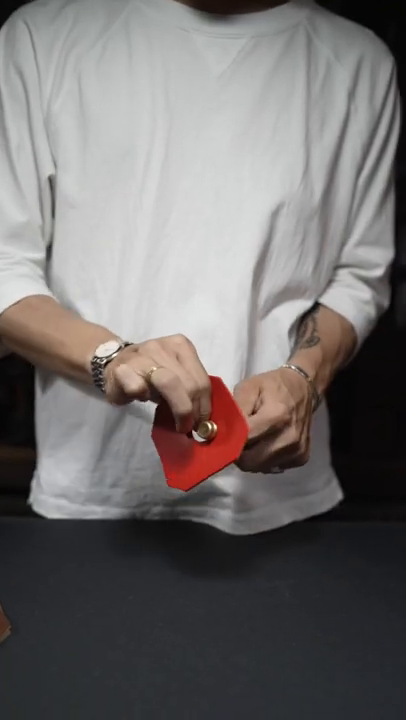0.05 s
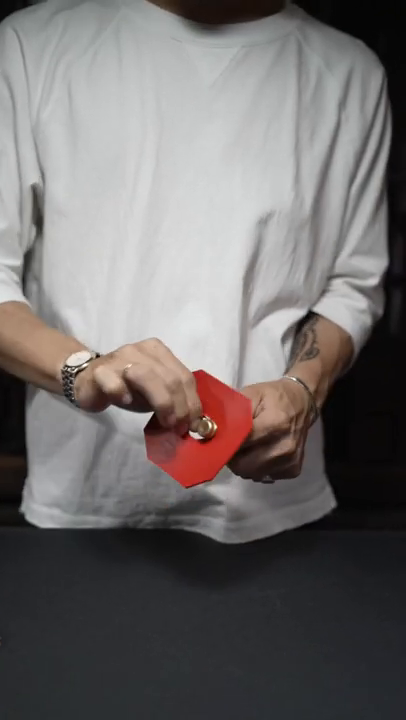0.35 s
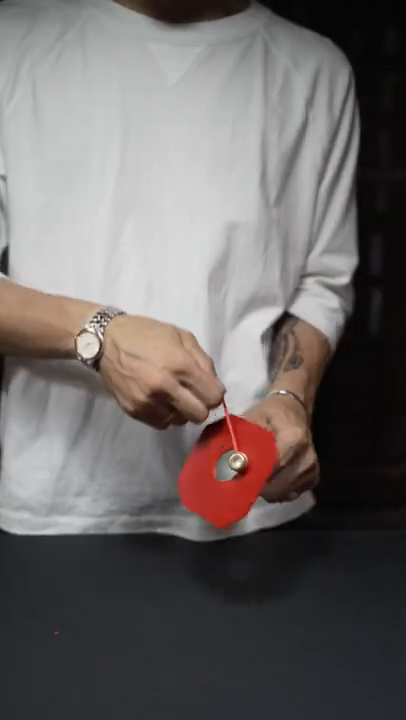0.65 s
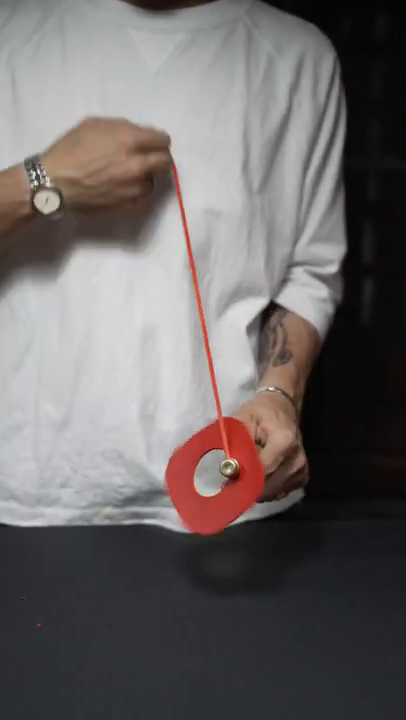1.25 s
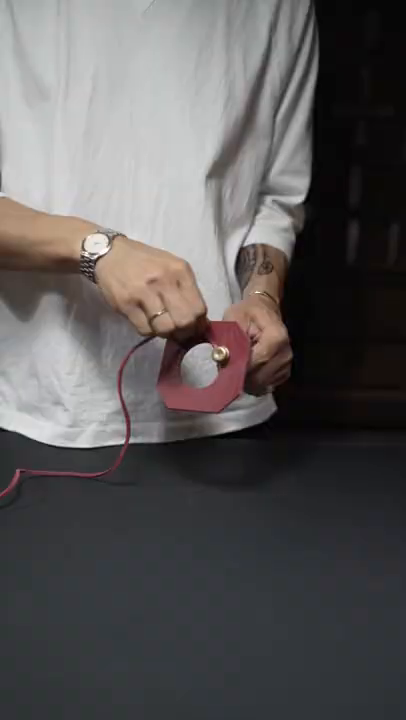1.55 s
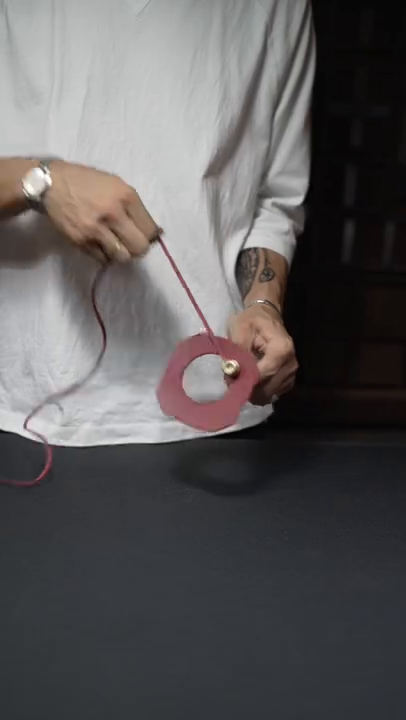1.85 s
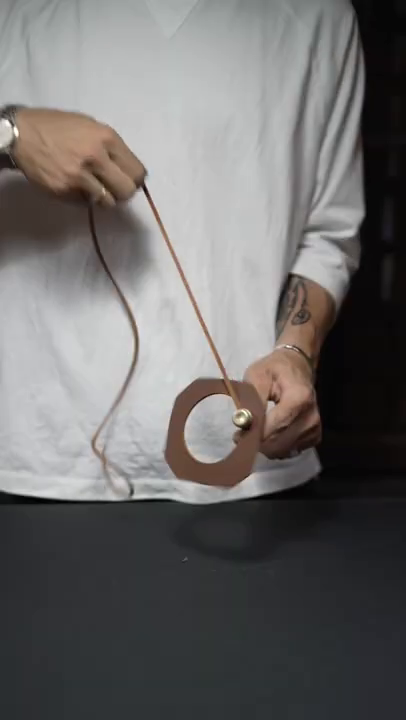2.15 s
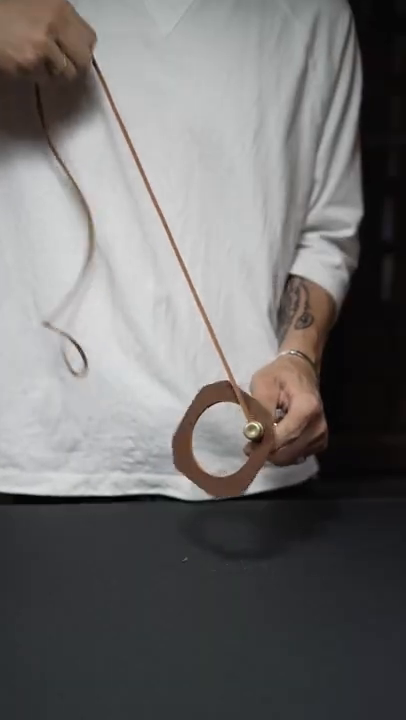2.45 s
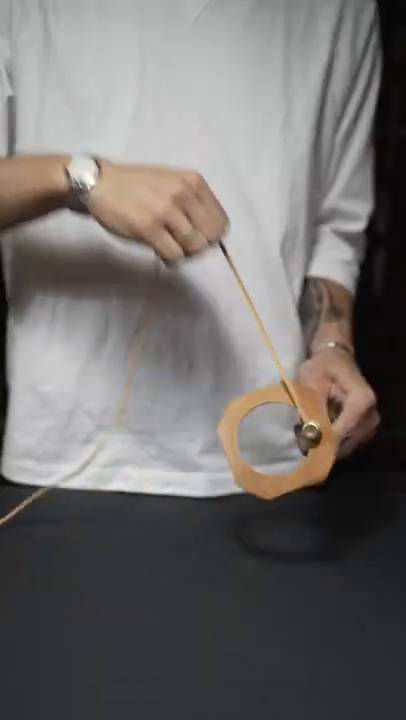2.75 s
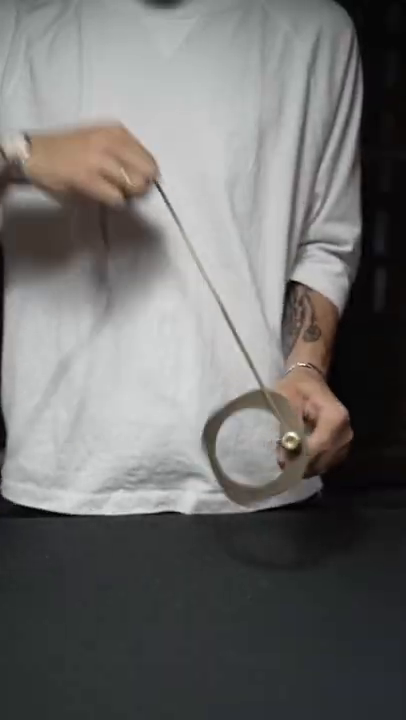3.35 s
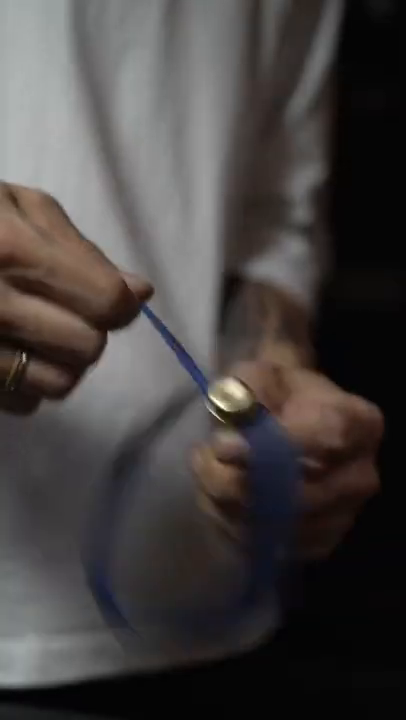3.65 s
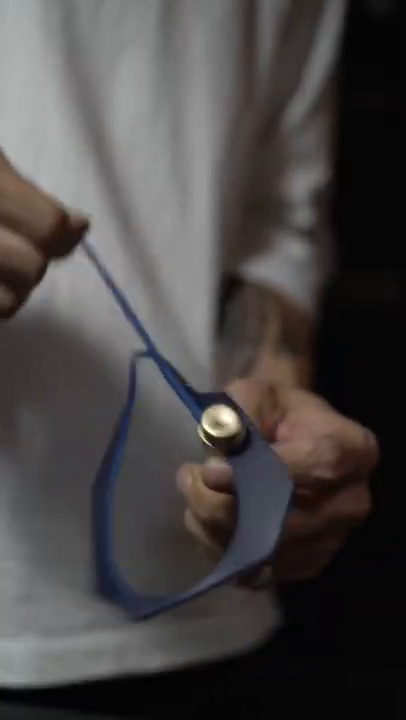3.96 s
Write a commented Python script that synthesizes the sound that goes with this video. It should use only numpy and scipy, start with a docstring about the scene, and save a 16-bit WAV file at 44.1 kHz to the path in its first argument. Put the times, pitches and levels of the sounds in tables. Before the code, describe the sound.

Leather being pulled through a small blade in repeated scraping, hissing strokes, with light clicks.

```python
"""Leather discs are pulled through a small brass lace cutter: a crackling first nick, a short tug,
then six long pulls on different hides. Fibres snap densely on the blade, and the lace sings faintly
in the slot. Fingers tick on the tool; underneath lie soft handling bumps, mains hum and a quiet room.
One close microphone, the same in both channels."""
import sys
import numpy as np
from scipy import signal
from scipy.fft import rfft, irfft
from scipy.io import wavfile
from scipy.ndimage import uniform_filter1d

SR = 44100
rng = np.random.default_rng(int(sys.argv[2]) if len(sys.argv) > 2 else 0)


def generate_wav(signal):
    """Clip the signal to [-1, 1] and save it as 16-bit WAV at the path in sys.argv[1]."""
    frames = np.transpose(np.atleast_2d(signal))
    scaled = np.clip(frames, -1, 1) * 32767
    pcm = np.round(scaled).astype(np.int16)
    wavfile.write(sys.argv[1], SR, pcm)


N = 4 * SR


def undb(db):
    """Decibels to gain."""
    return 10 ** (np.asarray(db) / 20)


def unit(x):
    """Scale to rms 1."""
    return x / np.sqrt(np.mean(x ** 2) + 1e-20)


def shaped(x, gain):
    """Filter by gain(freq_hz)."""
    freq_hz = np.arange(N // 2 + 1) * SR / N + .01
    return irfft(rfft(x) * gain(freq_hz), N)


def colour(x, points):
    """Filter by rows of freq_hz, gain_db."""
    hz, db = np.array(points, float).T
    return shaped(x, lambda f: undb(np.interp(np.log(f), np.log(hz), db)))


def band(x, low_hz, high_hz):
    """Steep band-pass."""
    return shaped(x, lambda f: 1 / ((1 + (low_hz / f) ** 12) * (1 + (f / high_hz) ** 12)))


def resonate(x, hz, width_hz):
    """One damped resonance."""
    return shaped(x, lambda f: 1 / (1 + 1j * (f / hz - hz / f) * hz / width_hz))


def wander(rate_hz):
    """Smooth random motion, rms 1."""
    return unit(shaped(rng.standard_normal(N), lambda f: 1 / (1 + (f / rate_hz) ** 2)))


# freq_hz, rms_db
HUM_PARTIALS = [(59.9, -57), (121, -82.5), (182.5, -73.5), (365, -72)]

def mains_hum(t):
    """Steady mains tone and overtones."""
    return sum(undb(db) * np.sqrt(2) * np.sin(2 * np.pi * (hz * t + rng.random()))
               for hz, db in HUM_PARTIALS)


# freq_hz, gain_db
AIR_SPECTRUM = [(15, 1), (35, -20.5), (80, -11.5), (140, -12.5), (350, -15), (700, -19.5), (1300, -30.5),
                (3000, -35.5), (8000, -36.5), (15500, -45)]

def room_air(rms_db=-59):
    """Dull, steady room noise."""
    return undb(rms_db) * unit(colour(rng.standard_normal(N), AIR_SPECTRUM))


def add_reflections(x, t, wet_db=-17, t60_s=.067):
    """Direct sound plus the workshop's short, faint reflections."""
    tail = rng.standard_normal(N) * np.exp(-np.log(1000) * t / t60_s)
    return x + undb(wet_db) * signal.fftconvolve(x, unit(tail) / np.sqrt(N))[:N]


# centre_s, peak_db, pitch_hz, half_width_s
HAND_BUMPS = [(0.143, -49.5, 22, 0.12), (0.195, -47.5, 94, 0.011), (0.316, -45, 73, 0.018),
              (0.343, -47, 21, 0.039), (0.493, -44.5, 77, 0.0094), (0.626, -50.5, 58, 0.036),
              (0.731, -50.5, 87, .025), (0.845, -44.5, 64, 0.0097), (1.016, -51, 87, 0.016),
              (1.162, -59, 96, 0.045), (1.255, -55, 18, 0.25)]

def hand_bumps(t):
    """Deep, soft thuds of the hands shifting grip."""
    out = 0
    for centre_s, peak_db, pitch_hz, half_width_s in HAND_BUMPS:
        offset_s = t - centre_s
        envelope = undb(peak_db) * np.exp(-(offset_s / half_width_s) ** 2)
        out += envelope * np.cos(2 * np.pi * pitch_hz * offset_s)
    return out


# start_s, peak_db, centre_hz, decay_s
TOOL_TICKS = [(0.0244, -34, 6400, .0007), (0.0318, -40, 6000, .0008), (0.038, -48, 5000, 0.0014),
              (0.0604, -42, 4500, 0.0017), (.088, -39, 5500, .0008), (0.108, -34, 5500, 0.0012),
              (0.169, -34.5, 5030, 0.0011), (0.176, -39, 6000, .0008), (0.196, -42, 5000, 0.00088),
              (0.222, -38, 4500, 0.00068), (0.2467, -35.5, 5000, 0.00068), (0.321, -51.5, 1400, 0.0031),
              (0.4199, -31.5, 3550, 0.00093), (.469, -39.5, 5960, 0.0012), (.4695, -46, 1260, 0.0023),
              (0.744, -39, 5900, 0.001), (0.754, -31, 5700, 0.00028), (1.568, -30, 6100, 0.00054),
              (1.581, -28, 6500, 0.00057), (1.6131, -31, 7000, 0.00076), (1.75, -30, 6000, .0015),
              (1.761, -34, 5500, .0015), (2.567, -34, 4500, 0.0022), (3.065, -24.5, 10000, 0.0011),
              (3.585, -38, 7000, 0.00051), (3.610, -44, 6000, 0.0008), (3.626, -48, 6000, .0008),
              (3.639, -41.5, 6000, 0.00066), (3.651, -41, 6000, 0.00055), (3.659, -34, 5970, 0.00037)]

def tool_ticks(t, width_ratio=1.77, rustle_db=-24.5, rustle_decay_s=.02):
    """Leather and fingers tick on the cutter: a dry crack, then a faint rustle."""
    out = 0
    for start_s, peak_db, centre_hz, decay_s in TOOL_TICKS:
        age_s = np.maximum(t - start_s, 0)
        envelope = np.exp(-age_s / decay_s) + undb(rustle_db) * np.exp(-age_s / rustle_decay_s)
        crack = (t >= start_s) * envelope * np.sign(rng.standard_normal(N))
        for _ in range(2):
            crack = resonate(crack, centre_hz, width_ratio * centre_hz)
        out += undb(peak_db) * crack / np.abs(crack).max()
    return out


# start_s, crest_s, end_s, start_hz, end_hz, width_hz, crest_rms_db
LACE_RESONANCES = [(.8, 0.857, 1.22, 3550, 3870, 280, -47.5), (1.04, 1.39, 1.54, 4680, 5146, 340, -45),
                   (1.36, 1.515, 1.63, 5150, 4850, 320, -43.5), (1.18, 1.33, 2, 7800, 8100, 250, -51.5),
                   (1.18, 1.296, 1.43, 10140, 10540, 500, -48), (1.64, 1.7, 1.76, 2300, 2250, 200, -54.5),
                   (1.8, 1.82, 1.91, 5600, 5350, 340, -40.5), (1.96, 2.03, 2.065, 5240, 5760, 340, -48),
                   (2.07, 2.11, 2.2, 2700, 1940, 240, -57), (2.27, 2.47, 2.56, 4850, 5070, 280, -54.5),
                   (2.13, 2.23, 2.3, 6520, 6500, 220, -58), (2.68, 2.73, 2.5, 8600, 8000, 350, -50),
                   (2.7, 2.76, 3.07, 6530, 6300, 260, -53), (2.8, 3.002, 3.1, 5700, 5500, 200, -55),
                   (3.2, 3.54, 3.47, 6250, 6040, 220, -46.5), (3.31, 3.34, 3.3, 9600, 9900, 600, -42),
                   (3.44, 3.49, 3.3, 9700, 8960, 597, -48), (3.664, 3.757, 4.2, 5400, 5280, 220, -46),
                   (3.71, 3.775, 4.3, 6500, 7220, 350, -51), (3.662, 3.674, 3.68, 3500, 3370, 700, -48.5),
                   (3.73, 3.77, 3.81, 1993, 2193, 240, -48.5), (3.87, 3.925, 3.7, 2050, 2900, 350, -53)]

def lace_singing(t, flutter_db=2.5, swell_power=.45):
    """The lace sings in the slot: narrow resonances swell and glide as it tightens."""
    out = 0
    flutter = undb(flutter_db * wander(rate_hz=84))
    for start_s, crest_s, end_s, start_hz, end_hz, width_hz, crest_db in LACE_RESONANCES:
        # Zero past end_s, even where that precedes the start or crest.
        swell = np.interp(t, [start_s, crest_s, end_s], [0, 1, 0]) ** swell_power
        pitch_hz = np.interp(t, [start_s, end_s], [start_hz, end_hz])
        phase = 2 * np.pi * np.cumsum(pitch_hz) / SR
        ring = np.tanh(wander(width_hz)) * np.cos(phase) + np.tanh(wander(width_hz)) * np.sin(phase)
        out += undb(crest_db) * swell * unit(ring * flutter)
    return out


DRAG_TOP_HZ, SCRAPE_TOP_HZ = 1500, 8000

def disc_turning(x, depth_db=2.8, span_hz=400, span_s=.06, frame=512):
    """Spectral peaks and dips drift as the leather turns and flexes; the low drag stays even."""
    hz, _, cells = signal.stft(x, SR, nperseg=frame)
    drift = rng.standard_normal(cells.shape)
    for _ in range(2):
        drift = uniform_filter1d(drift, round(span_hz * frame / SR), axis=0)
        drift = uniform_filter1d(drift, round(span_s * SR * 2 / frame), axis=1)
    drift = 2 * np.tanh(unit(drift) / 2)
    low_taper = np.minimum(hz / DRAG_TOP_HZ, 1)[:, None] ** 2
    gain = unit(undb(depth_db * low_taper * drift))
    return signal.istft(cells * gain, nperseg=frame)[1][:N]


def blade_contact(t, effort, edge_s=.0022):
    """1 while the blade is in the leather, else 0; short ramps between."""
    start_s, end_s = effort[0][0], effort[-1][0]
    bite = np.clip((t - start_s) / edge_s + .5, 0, 1)
    release = np.clip((end_s - t) / edge_s + .5, 0, 1)
    return bite * release


def fibre_snaps(snaps_per_s, spread_db, decay_s=.00013, limit_re_rms=.79, rub_db=-2):
    """Fibres give way at a limited force, in tiny random bursts over the blade's smooth rub."""
    snaps = (rng.random(N) < snaps_per_s / SR) * undb(spread_db * rng.standard_normal(N))
    bursts = unit(signal.lfilter([1], [1, -np.exp(-1 / (decay_s * SR))], snaps))
    crackle = np.tanh(bursts / limit_re_rms) * np.sign(rng.standard_normal(N))
    rub = undb(rub_db) * rng.standard_normal(N)
    return unit(unit(crackle) + rub)


# Effort per pull, hides named by colour: time_s, effort_db
NICK = [(.03, -56.5), (.058, -58), (.0615, -50), (.12, -48), (.225, -52.5), (.262, -63), (.3, -74)]
TUG = [(.533, -48), (.57, -41), (.605, -40), (.65, -42.5), (.685, -47.5), (.705, -60), (.742, -72)]
RED = [(.748, -48), (.835, -39), (.925, -43.5), (.978, -39.5), (1.04, -42), (1.2, -40), (1.39, -39.5),
       (1.47, -41), (1.52, -39.5), (1.568, -44.5)]
PLUM = [(1.614, -43), (1.685, -39.5), (1.73, -43), (1.785, -44.5), (1.822, -37.5), (1.88, -40),
        (1.945, -43), (2.03, -36), (2.067, -42.5)]
BROWN = [(2.069, -47), (2.105, -48.5), (2.16, -41), (2.2, -42.5), (2.235, -40.5), (2.265, -46), (2.33, -47),
         (2.43, -45), (2.475, -42), (2.53, -48), (2.567, -50.5)]
TAN = [(2.568, -41), (2.65, -42), (2.728, -36), (2.8, -38.5), (2.86, -40.5), (2.892, -37.5), (2.978, -42),
       (3.05, -41.5), (3.07, -39.5)]
GREY = [(3.0805, -46.5), (3.14, -42.5), (3.26, -39), (3.32, -39), (3.336, -35.5), (3.42, -43.5),
        (3.46, -39.5), (3.57, -39.5)]
BLUE = [(3.663, -41.5), (3.78, -41), (3.87, -42.5), (3.95, -39.5), (4.0, -46)]
# Spectrum per pull: freq_hz, gain_db
NICK_TONE = [(400, -10), (1000, -9), (1400, -7), (1950, 4), (2900, -9), (3600, -4.5), (4400, -11),
             (5200, -7.5), (7000, -9), (9200, -3), (11000, -12), (15500, -21)]
TUG_TONE = [(400, -12), (800, -5), (1350, -9.5), (1900, -6.5), (2600, -11.5), (3700, -0.5), (4400, 0.5),
            (5400, -6), (9000, -5), (15500, -7.5)]
RED_TONE = [(400, -16), (520, -21), (750, -9), (1150, -17.5), (1900, -10), (3100, -10), (4700, -3),
            (6300, -3.5), (7300, -8.5), (8700, -11.5), (10500, -13.5), (15500, -14.5)]
PLUM_TONE = [(400, -16), (800, 0), (1300, -13), (1700, -15.5), (2300, -9), (3000, -13.5), (3500, -7.5),
             (4400, -7), (5600, -2), (9500, -1), (12500, -7), (15500, -14)]
BROWN_TONE = [(400, -22.5), (520, -24), (800, -12), (1300, -19), (2200, -10.5), (3000, -15), (3500, -8.5),
              (5000, -5.5), (7600, -7.5), (11000, -4.5), (15500, -5)]
TAN_TONE = [(400, -23.5), (550, -23), (800, -12.5), (1100, -23), (1900, -10.5), (3200, -8), (4400, -6),
            (5600, -0.5), (7300, -0.5), (8500, 3), (12000, -3), (15500, -5)]
GREY_TONE = [(400, -18), (550, -14), (850, -4.5), (1200, -12), (2100, -6.5), (2700, -13), (3500, -3.5),
             (4100, -6), (4800, -4), (6200, 0), (7300, -3), (9500, 1.5), (15500, -1)]
BLUE_TONE = [(400, -7.5), (520, -13.5), (820, -6), (1100, -11.5), (1600, -13), (2300, -8), (3800, -6),
             (4600, -10.5), (5300, -2), (6000, -8), (6800, -2), (9800, -2), (12000, -10), (15500, -13)]
# effort, tone, snaps_per_s, spread_db, drag_db, scrape_re_effort_db, hiss_re_effort_db
PULLS = [(NICK, NICK_TONE, 1000, 7.4, -62, -1.3, -8), (TUG, TUG_TONE, 2600, 3.1, -61, -1.9, -5.8),
         (RED, RED_TONE, 2600, 2.3, -58.5, -3.5, -3), (PLUM, PLUM_TONE, 2800, 2.7, -60, -1.6, -7.5),
         (BROWN, BROWN_TONE, 4500, 2, -61, -3, -1.5), (TAN, TAN_TONE, 3500, 1.9, -63.5, -4, -3),
         (GREY, GREY_TONE, 7000, 2.3, -61, -5, -0.79), (BLUE, BLUE_TONE, 4000, 2.8, -59, -4, -4.5)]

def leather_pull(t, effort, tone, snaps_per_s, spread_db, drag_db, scrape_re_db, hiss_re_db):
    """One pull through the blade: drag, scrape and hiss judder with uneven feed; harder is brighter."""
    time_s, effort_db = np.array(effort).T
    median_db = np.median(effort_db)
    surge_db = np.interp(t, time_s, effort_db) - median_db
    cut = colour(fibre_snaps(snaps_per_s, spread_db), tone)
    drag = unit(band(cut, 247, DRAG_TOP_HZ)) * undb(drag_db + .25 * surge_db)
    scrape = unit(band(cut, DRAG_TOP_HZ, SCRAPE_TOP_HZ)) * undb(median_db + scrape_re_db + surge_db)
    hiss = unit(band(cut, SCRAPE_TOP_HZ, SR / 2)) * undb(median_db + hiss_re_db + 1.13 * surge_db)
    judder = undb(.66 * wander(rate_hz=57))
    return blade_contact(t, effort) * judder * (drag + scrape + hiss)


def scene():
    """Mono mix on two channels; the lace sings only while it moves."""
    t = np.arange(N) / SR
    moving = sum(blade_contact(t, effort) for effort, *_ in PULLS)
    cutting = disc_turning(sum(leather_pull(t, *row) for row in PULLS))
    cutter = cutting + moving * lace_singing(t) + tool_ticks(t)
    mono = add_reflections(cutter, t) + hand_bumps(t) + mains_hum(t) + room_air()
    return np.array([mono, mono])


def record(dry):
    """Steep low-pass on the top treble."""
    cutoff_hz = 15750
    return signal.sosfilt(signal.ellip(10, .1, 70, cutoff_hz, fs=SR, output="sos"), dry)


dry = scene()
out = record(dry)
generate_wav(out)
```